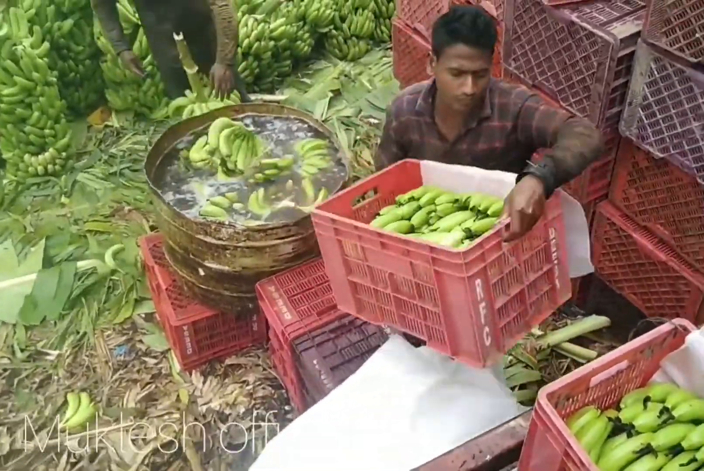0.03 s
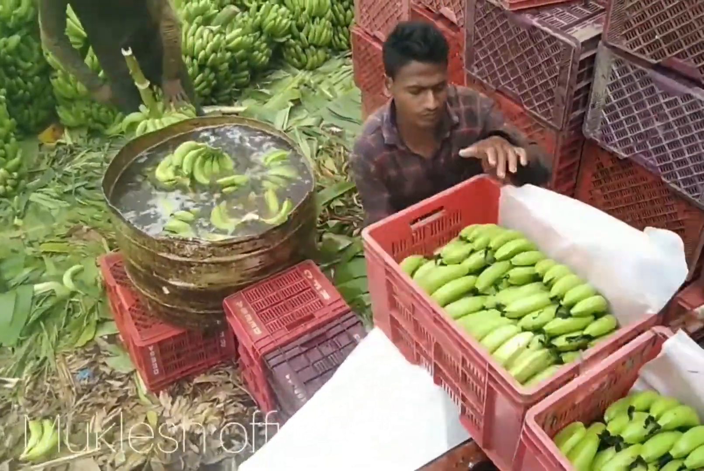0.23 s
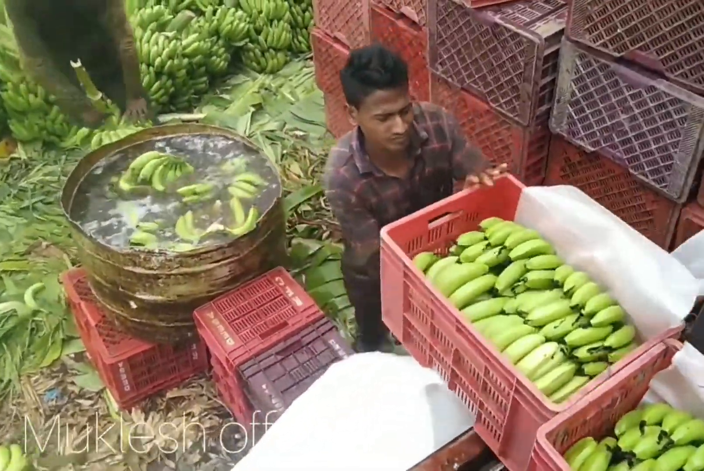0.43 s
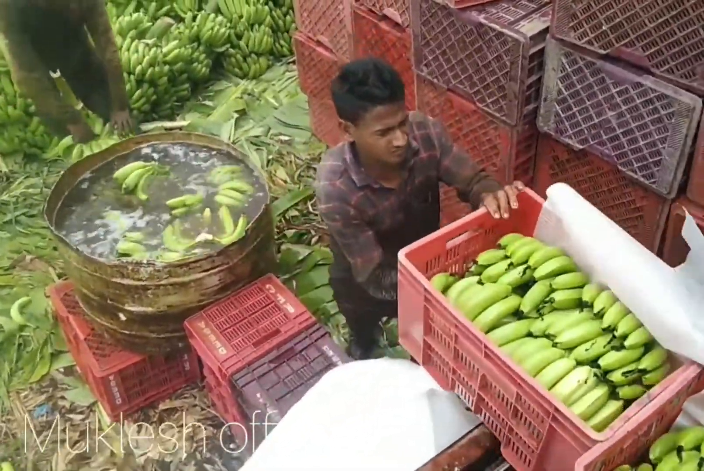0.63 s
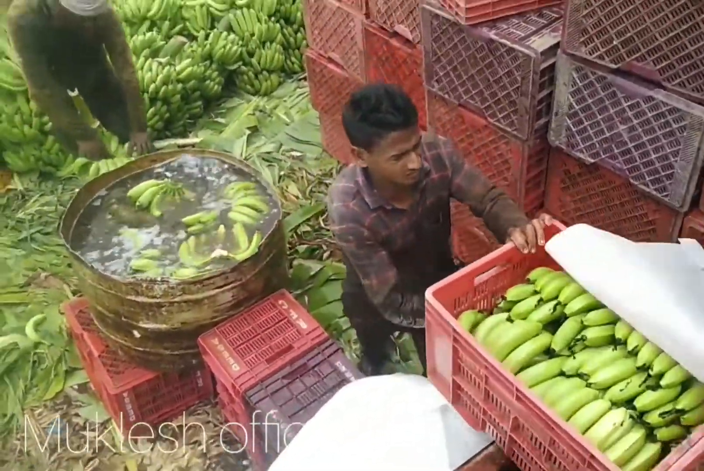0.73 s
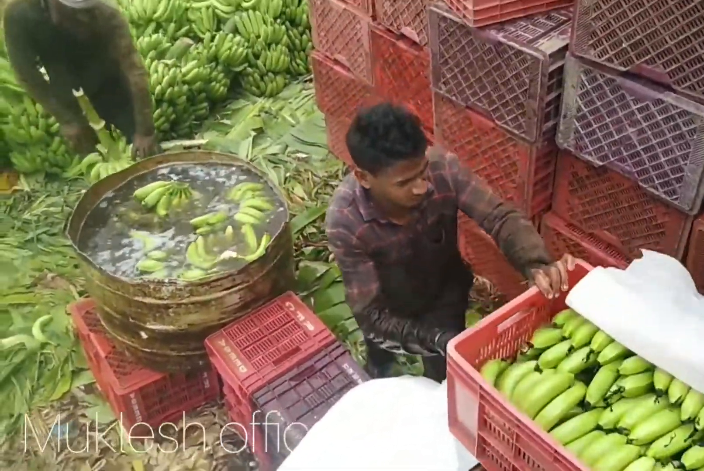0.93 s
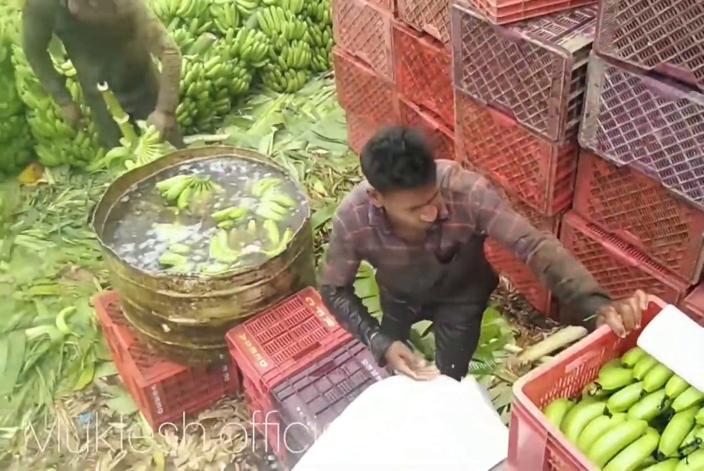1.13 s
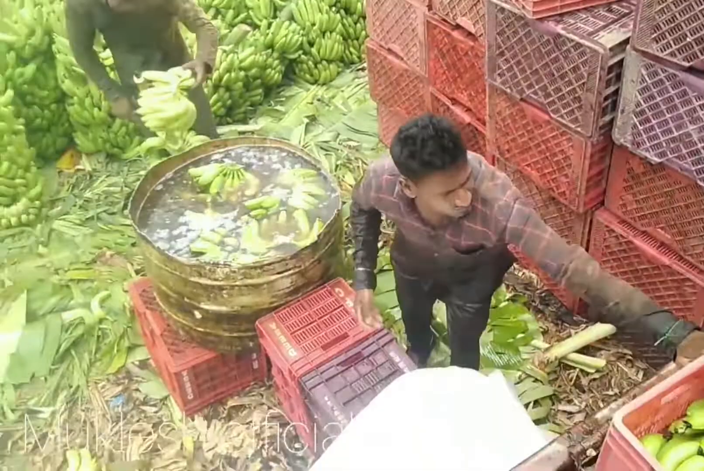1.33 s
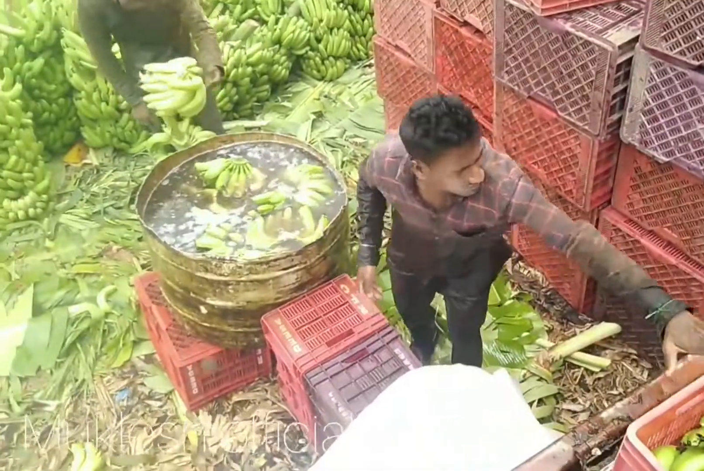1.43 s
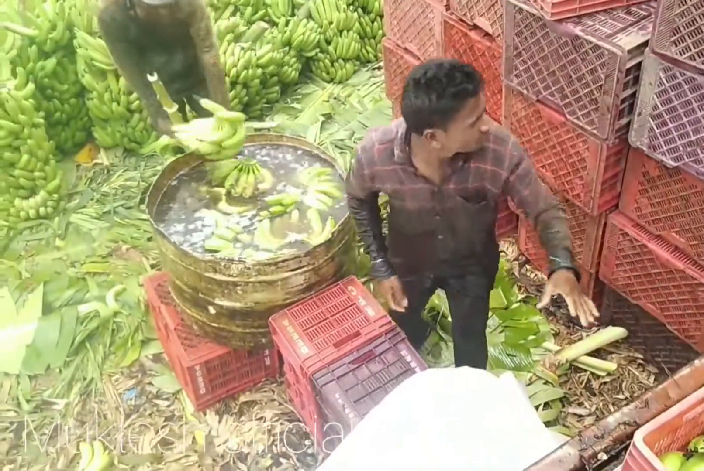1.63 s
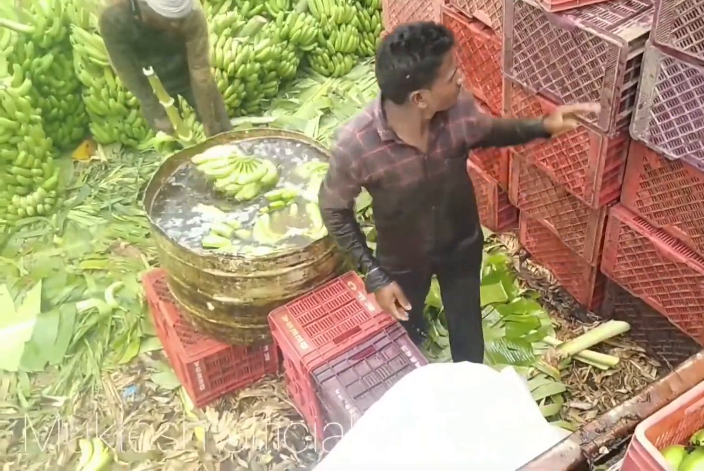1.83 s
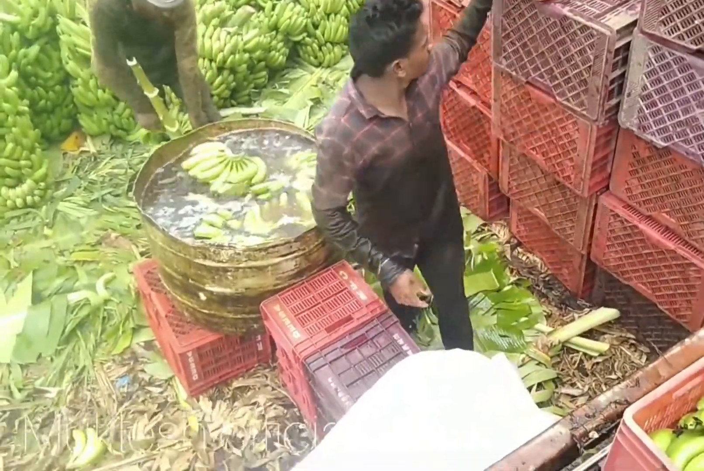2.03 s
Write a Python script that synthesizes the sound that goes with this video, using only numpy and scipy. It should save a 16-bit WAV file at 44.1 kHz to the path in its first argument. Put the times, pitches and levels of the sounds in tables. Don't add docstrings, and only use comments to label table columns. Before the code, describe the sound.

Heavy plastic crate of fruit lands with clattering knocks, then is dragged roughly across a truck floor

```python
import sys
import numpy as np
from scipy import signal
from scipy.fft import rfft, irfft
from scipy.io import wavfile
from scipy.ndimage import uniform_filter1d

SR = 44100
rng = np.random.default_rng(int(sys.argv[2]) if len(sys.argv) > 2 else 0)


def linear_from_db(decibels):
    return 10 ** (np.asarray(decibels, float) / 20)


def waveform_to_disk(signal):
    frames = np.transpose(np.atleast_2d(signal))
    scaled = np.clip(frames, -1, 1) * 32767
    samples = np.round(scaled).astype(np.int16)
    wavfile.write(sys.argv[1], SR, samples)


N = 92036


def level(x, db):
    return x * linear_from_db(db) / np.sqrt(np.mean(x ** 2))


def high(x, hz):
    return signal.sosfilt(signal.butter(4, hz, "high", fs=SR, output="sos"), x)


def colour(x, points):
    hz, db = np.array(points, float).T
    log_hz = np.log(np.maximum(np.arange(N // 2 + 1) * SR / N, 1))
    gain = linear_from_db(np.interp(log_hz, np.log(hz), db, left=-60, right=-60))
    return level(irfft(rfft(x) * gain, N), 0)


def curve(table, col, rest=-120):
    rows = np.array(table, float)
    return np.interp(np.arange(N) / SR, rows[:, 0], rows[:, col], left=rest, right=rest)


def walk(rate_hz):
    hold = int(SR / rate_hz)
    steps = np.repeat(rng.standard_normal(size=4000), hold)[:N + hold]
    return 1.22 * uniform_filter1d(uniform_filter1d(steps, hold), hold)[:N]


def ring(x, hz, t60_s):
    pole = np.exp(2j * np.pi * hz / SR - np.log(1000) / (max(t60_s, .002) * SR))
    return signal.lfilter([1], [1, -pole], x).imag


def grains(per_s, spread_db, smear_s):
    draw = rng.random((N, 2))
    size = linear_from_db(2 * spread_db * np.minimum(-np.log(1 - draw[:, 1]), 5.0))
    clicks = (draw[:, 0] < per_s / SR) * size
    power = signal.lfilter([1], [1, -np.exp(-1 / (smear_s * SR))], clicks)
    return np.sqrt(power + 1e-9) * rng.standard_normal(N)


ATTACK_S = .0008


def burst(length_s, tail_s, tail_db, size=8192):
    t = np.arange(size) / SR
    hold = np.exp(-(t / length_s) ** 2)
    scatter = linear_from_db(tail_db) * np.exp(-t / tail_s)
    return np.minimum(t / ATTACK_S, 1) * (hold + scatter) * np.tanh(2 * rng.standard_normal(size))


def add(out, start_s, x, peak_db):
    i = int(start_s * SR)
    x = x[:N - i]
    out[i:i + len(x)] += x * linear_from_db(peak_db) / np.abs(x).max()


# start_s, level_db
WIND_GUSTS = [(0, -44), (.035, -41.5), (.09, -56.5), (.24, -43), (.36, -45.5), (.5, -43), (.55, -54),
              (.69, -45), (.8, -50.5), (1.1, -62.5), (1.25, -54.5), (1.43, -40.5), (1.54, -46.5),
              (1.6, -43.5), (1.69, -49), (1.79, -36.5), (1.87, -56.5), (2.09, -59)]
# freq_hz, level_db (per Hz)
GUST_TONE = [(15, 4.5), (60, 0.5), (100, -4.5), (170, -22), (250, -22.5), (350, -19.5), (600, -80)]
# freq_hz, level_db (per Hz)
AIR_TONE = [(290, -8), (500, -4), (946, -5), (4280, -8), (4870, -14), (7420, -4.5), (9630, -22),
            (12700, -12.5), (16000, -10)]


def outdoors():
    wind_db = curve(WIND_GUSTS, 1) + 2 + 1.1 * walk(15)
    wind = colour(rng.standard_normal(N), GUST_TONE) * linear_from_db(wind_db)
    air = np.zeros(N)
    for hz in 500 * 2 ** np.arange(0, 5.1, .5):
        band = level(ring(rng.standard_normal(N), hz, 4 / hz), 0)
        air += band * np.sqrt(hz) * linear_from_db(3 * walk(22))
    floor = colour(np.diff(air, prepend=0) + air, AIR_TONE) * linear_from_db(-57.5)
    return wind + buffets() + floor


CRACKLE_SPREAD_DB = 2


def creases():
    per_s, cycles = 60, 11
    pops = np.zeros(N)
    for hz in 700 * 2 ** np.arange(0, 4.4, .33):
        pop = ring(grains(per_s, CRACKLE_SPREAD_DB, smear_s=0.0016), hz, cycles / hz)
        pops += level(pop, 0) * np.sqrt(hz)
    return pops


# start_s, level_db
SHEET_STIRS = [
    [(0, -48.5), (.045, -49.5), (.07, -56.5), (.11, -49), (.135, -54), (.165, -59)],
    [(1.66, -66), (1.702, -57), (1.71, -42), (1.76, -44), (1.81, -44), (1.86, -46.5), (1.9, -53),
     (1.99, -58.5), (2.03, -59.5), (2.09, -69)],
]
# freq_hz, level_db (per Hz)
SHEET_TONE = [(240, -8), (400, -11.5), (687, -12), (921, -13), (1530, -9), (4800, -16), (7750, -16),
              (14800, -24.5), (16000, -3)]


def rustle():
    stir = sum(linear_from_db(curve(rows, 1)) for rows in SHEET_STIRS)
    crackle = level(grains(1100, CRACKLE_SPREAD_DB, smear_s=0.0031), 0) + level(creases(), -6)
    return colour(crackle, SHEET_TONE) * stir * linear_from_db(0.65 * walk(39.0))


# start_s, peak_db, ring_hz, ring_t60_s, crack_db (re ring)
TICK_EVENTS = [(.002, -42, 918, 0.067, -31), (0.022, -41, 1780, 0.027, -38), (0.036, -42, 810, 0.039, -16),
               (0.087, -42, 910, 0.011, -16), (.111, -30.5, 4600, .004, 4),
               (1.547, -33.5, 7100, 0.0049, -11), (1.707, -30, 6100, 0.0046, 13),
               (1.797, -34.5, 7500, .004, -8), (1.841, -33.5, 5600, .003, 8),
               (1.904, -37.5, 1560, 0.016, -12), (1.938, -41.5, 1770, 0.036, -14),
               (1.951, -45, 2800, .012, -13), (1.974, -41, 4520, 0.0045, -14), (1.984, -40, 4350, .006, 0),
               (2.072, -39.5, 8050, .003, 8)]
# freq_hz, level_db (per Hz)
SNAP_TONE = [(880, -50), (1500, -65), (2340, -7.5), (5600, -3.5), (7030, -1.5), (10700, -13), (14800, -1.5),
             (16000, -14)]


def ticks():
    out = np.zeros(N)
    for start_s, peak_db, hz, t60_s, crack_db in TICK_EVENTS:
        push = burst(length_s=0.012, tail_s=0.01, tail_db=25.0)
        rung = level(high(ring(push, hz, t60_s), hz / 2), 0)
        crack = colour(np.pad(push, (0, N - len(push))), SNAP_TONE)[:len(push)]
        crack = level(crack, crack_db) * np.sqrt(N / len(push))
        add(out, start_s, rung + crack, peak_db)
    return out


# start_s, peak_db, ring_hz, ring_t60_s
RATTLE_TAPS = [(.0315, -32, 846, 0.042), (.172, -12.5, 1458, 0.036), (.175, -18, 563, 0.014),
               (.2455, -18, 2230, 0.023), (.2465, -19, 4200, 0.0033), (0.4549, -20, 1410, 0.01),
               (1.059, -26.5, 335, .08), (1.264, -27, 400, .06), (1.318, -24.5, 273, .08),
               (1.362, -28.5, 340, .06), (1.47, -29.5, 333, 0.064), (.183, -26, 9560, 0.024),
               (.208, -27, 10030, 0.04), (.216, -22.5, 8130, 0.022), (.558, -36, 1730, 0.038),
               (.570, -23.5, 1764, 0.038), (1.692, -48, 3690, .015), (1.708, -54, 3840, .015),
               (1.717, -47, 2490, 0.017), (1.724, -43, 1760, 0.026), (1.734, -43, 1510, 0.0092),
               (1.745, -35, 1900, 0.014), (1.751, -41, 2460, .012), (1.765, -39, 1710, .02),
               (1.778, -41, 1610, .015), (1.788, -47, 1360, .012), (1.7955, -31, 1490, 0.032),
               (1.800, -33.5, 2680, 0.012), (1.801, -37, 680, 0.04), (1.815, -40, 4400, 0.013),
               (1.8237, -32, 1570, 0.012), (1.832, -40, 1610, 0.018), (1.841, -40, 1640, .018),
               (1.845, -46, 666, 0.033), (1.857, -48, 1600, .02), (1.862, -41, 3800, 0.013),
               (1.870, -50, 3220, 0.013)]


def rattle():
    out = np.zeros(N)
    for start_s, peak_db, hz, t60_s in RATTLE_TAPS:
        tap = burst(length_s=0.0022, tail_s=0.0025, tail_db=-22.5, size=4096)
        add(out, start_s, high(ring(tap, hz, t60_s), hz / 2), peak_db)
    return out


WALLS_FROM_HZ = 120
# mode_hz, level_db, t60_s
WALL_MODES = [(147, -31, 0.11), (259, -1, 0.28), (400, -3.5, 0.069), (604, 3, 0.022), (870, 1, 0.019),
              (997, -3.5, 0.028), (1126, -0.5, 0.0084), (1490, -1.5, 0.055), (1833, -4.5, 0.028),
              (2200, -0.5, 0.01), (2800, -11, 0.024), (3800, -15, 0.015), (4630, -11, 0.0087)]


def walls(x, centre_hz=0, patchy_db=0):
    rung = np.zeros(len(x))
    for hz, db, t60_s in WALL_MODES:
        if centre_hz:
            db = db - 3 * np.log2(hz / centre_hz) ** 2
        else:
            db = db + patchy_db * walk(30.71)
        detuned_hz = hz * (1 + 0.04 * rng.standard_normal())
        rung = rung + linear_from_db(db) * ring(x, detuned_hz, t60_s) / np.sqrt(t60_s)
    return high(rung, WALLS_FROM_HZ)


# start_s, drag_db, hiss_db (re drag), panel_load_db (re drag)
DRAG_PULL = [(.171, -25, -8, -12), (.2, -29, -3, -6), (.235, -30, -0.5, -6.5), (.29, -35.5, -4, 4.5),
             (.34, -37, -5.5, -7.5), (.41, -38, -2.5, 4), (.5, -36.5, -3.5, -11), (.58, -34, -2, -14.5),
             (.72, -35, 0.5, -13.5), (.99, -35.5, 0, -14.5), (1.03, -31.5, -2.5, -2),
             (1.1, -32.5, 0.5, -14), (1.22, -32.5, 0.5, -23), (1.3, -29.5, -1, -10),
             (1.41, -31.5, -4.5, -26), (1.485, -38.5, -8.5, -7.5), (1.52, -54, -4, 7.5),
             (1.57, -58.5, -28, -21)]
# freq_hz, level_db (per Hz)
SCRAPE_TONE = [(120, -72), (200, -45), (248, -3), (430, -1), (520, -5), (937, 0.5), (1950, -4), (3500, -16),
               (4550, -30), (7700, -120)]
# freq_hz, level_db (per Hz)
HISS_TONE = [(1470, 2.5), (2500, -3), (3980, -1.5), (5440, -6.5), (6300, -4.5), (7770, 0.5), (10800, -13),
             (14900, -5.5), (16000, -14)]


def drag():
    grit_per_s, spread_db = 8000, 1
    panel_hz, panel_width_hz = 212, 160
    grit, drag_db = grains(grit_per_s, spread_db, smear_s=0.0011), curve(DRAG_PULL, 1)

    scrape = colour(grit, SCRAPE_TONE) + level(walls(grit, patchy_db=7.5), -11)
    body = level(scrape, 0) * linear_from_db(drag_db + 1.0 * walk(24.55))

    sheet = level(grains(grit_per_s, spread_db, smear_s=0.0048), 0) + level(creases(), -7.5)
    hiss = colour(sheet, HISS_TONE) * linear_from_db(drag_db + curve(DRAG_PULL, 2, 0) + 1.15 * walk(30.2))

    panel = ring(ring(grit, panel_hz, 2.25 / panel_width_hz), panel_hz, 2.06 / panel_width_hz)
    panel_db = drag_db + curve(DRAG_PULL, 3, 0) + 2.0 * walk(15.25)
    return body + hiss + level(high(panel, WALLS_FROM_HZ), 0) * linear_from_db(panel_db)


# start_s, peak_db, contact_s, hardness_db (treble), centre_hz (walls)
BLOW_EVENTS = [(0.1724, -11.5, 0.0062, -17, 1210), (0.193, -14.5, 0.015, -11, 400),
               (0.243, -13.5, 0.0035, -18, 2180), (0.2458, -10.5, 0.0065, -7, 1160),
               (0.254, -15, 0.0046, -22, 696), (.2585, -17.5, 0.0039, -17, 900),
               (0.281, -19.5, 0.012, -35, 175), (0.396, -30.5, 0.011, -30, 182),
               (0.436, -23.5, 0.012, -18, 900), (.446, -23.5, 0.011, -25, 450),
               (0.453, -23, 0.004, -12, 1350), (0.462, -20, 0.0047, -14, 805),
               (0.475, -33, 0.011, -32, 143), (1.049, -24.5, 0.024, -30, 327),
               (1.268, -24, 0.023, -27, 323), (1.308, -25.5, 0.016, -29, 254)]


def blows():
    out = np.zeros(N)
    for start_s, peak_db, contact_s, hardness_db, centre_hz in BLOW_EVENTS:
        push = burst(contact_s, tail_s=0.04, tail_db=-12.5)
        strike = np.zeros(len(push))
        strike[int(ATTACK_S * SR)] = 0.73 * np.sqrt(np.sum(push ** 2))
        knock = high(walls(push + strike, centre_hz), centre_hz / 6.0)
        clack = high(ring(push, 2500, 0.002), 2060)
        add(out, start_s, level(knock, 0) + level(clack, hardness_db), peak_db)
    return out


# start_s, peak_db, pitch_hz, length_cycles
EDDIES = [(0.801, -36, 49.7, 1.5), (1.289, -36, 55.7, 1.7), (1.425, -33, 56, 2.3), (1.478, -31, 93, 2.3),
          (1.569, -31.5, 66, 0.99), (1.593, -38.5, 180, 2), (1.715, -36, 114, 1.55), (1.742, -40, 70, 1.4),
          (1.774, -32, 50.4, 0.78), (1.799, -37, 92, 3.2)]


def buffets():
    out = np.zeros(N)
    for start_s, peak_db, hz, cycles in EDDIES:
        turn = np.arange(int(cycles / hz * SR)) * hz / SR
        swell = np.sin(np.pi * turn / cycles) ** 2
        add(out, start_s, np.sin(2 * np.pi * (turn + rng.random())) * swell, peak_db)
    return out


# mode_hz, level_db, t60_s
RIM_MODES = [(1960, -14, 0.0071), (2380, 6, 0.018), (2820, 4, 0.015), (3400, 6, 0.012), (4380, 3, 0.01),
             (4900, -5, 0.0054), (5800, -11, .004), (7100, 1, 0.008)]


def rim():
    out = np.zeros(N)
    push = burst(length_s=0.0034, tail_s=0.0065, tail_db=1.0)
    snap = sum(level(ring(push, hz, t60_s), db) for hz, db, t60_s in RIM_MODES)
    add(out, 1.547, high(snap, 2250), -28)
    return out


# freq_hz, unrelated_share (of the time, 0 to 1)
TREBLE_SPREAD = [(4000, 0), (4500, .22), (5400, .45), (6300, .18), (7500, .04), (9000, .4), (11000, .85),
                 (13500, .4), (15500, .2)]


def apart(mid):
    band_hz = 650
    f, _, z = signal.stft(mid, SR, nperseg=1024)
    chance = uniform_filter1d(rng.standard_normal((40, z.shape[1])), size=7, axis=1)
    rank = chance.argsort(axis=1).argsort(axis=1) / z.shape[1]
    centre_hz = f // band_hz * band_hz + band_hz / 2
    share = np.interp(centre_hz, *np.array(TREBLE_SPREAD).T, left=0, right=0)
    is_open = rank[(f / band_hz).astype(int)] < share[:, None]
    random_phase = np.exp(2j * np.pi * rng.random(z.shape))
    return signal.istft(z * is_open * random_phase, SR, nperseg=1024)[1][:N]


def scene():
    mid = rustle() + ticks() + rattle() + drag() + blows() + rim()
    duck_s, duck_width_s, duck_db = 0.161, 0.008, -8
    dip = np.exp(-((np.arange(N) / SR - duck_s) / duck_width_s) ** 2)
    mid = mid + outdoors() * linear_from_db(duck_db * dip)
    side = high(apart(mid), 4700) * linear_from_db(-3)
    return np.array([mid + side, mid - side])


def band_limit(x):
    return signal.sosfilt(signal.butter(12, 16680, fs=SR, output="sos"), x)


def record(dry):
    top_cut = signal.ellip(10, .2, 70, 15600, fs=SR, output="sos")
    mix = signal.sosfilt(top_cut, dry)
    return band_limit(mix)


dry = scene()
out = record(dry)
waveform_to_disk(out)
```